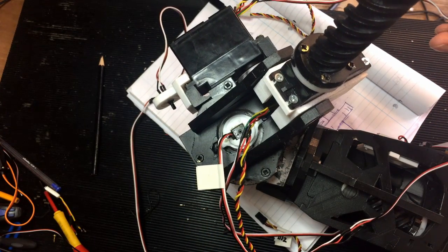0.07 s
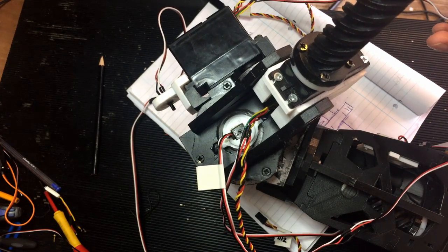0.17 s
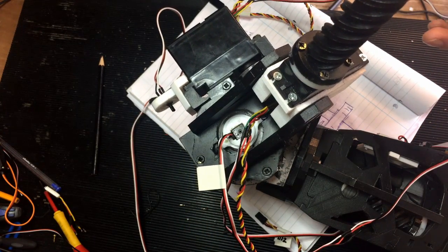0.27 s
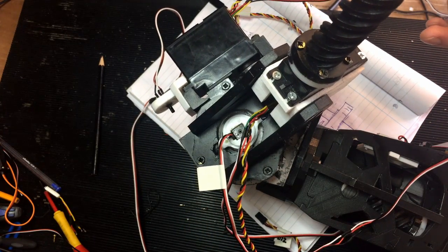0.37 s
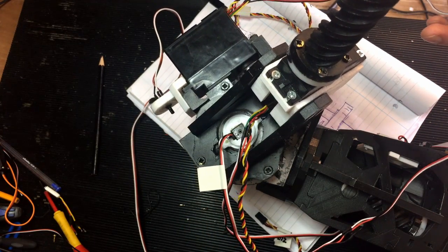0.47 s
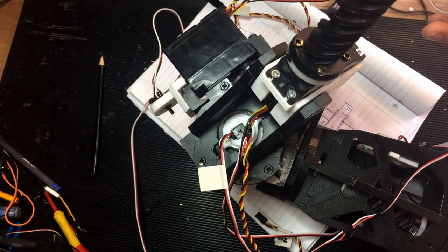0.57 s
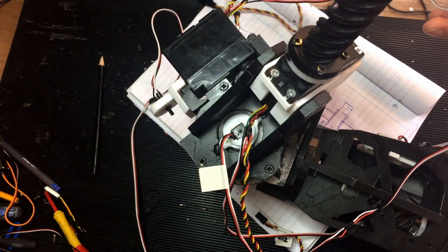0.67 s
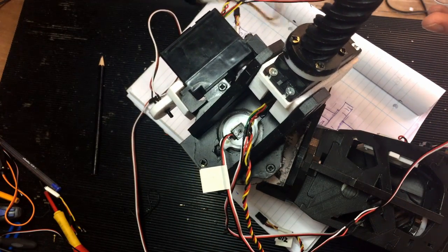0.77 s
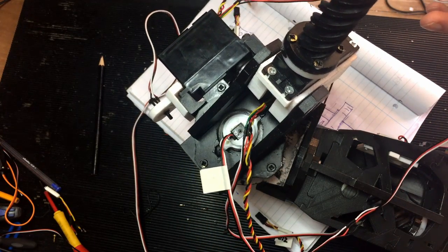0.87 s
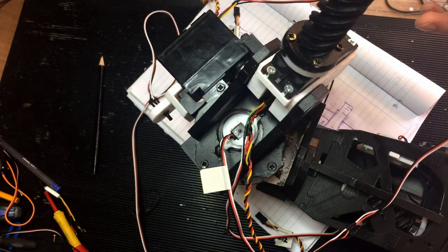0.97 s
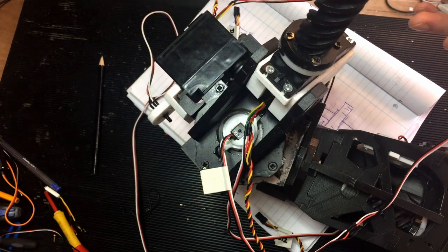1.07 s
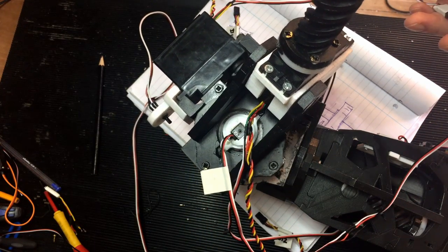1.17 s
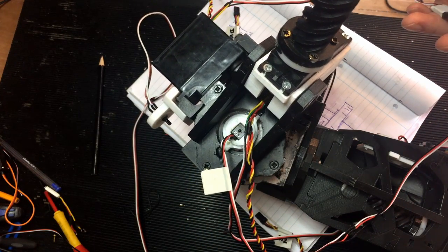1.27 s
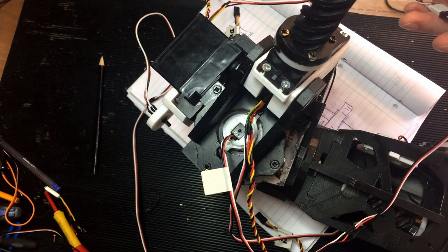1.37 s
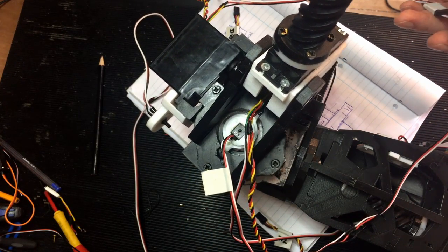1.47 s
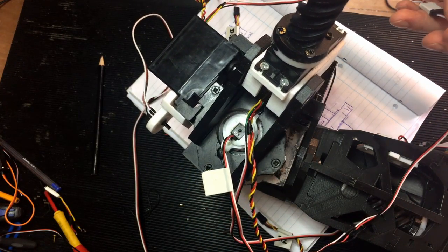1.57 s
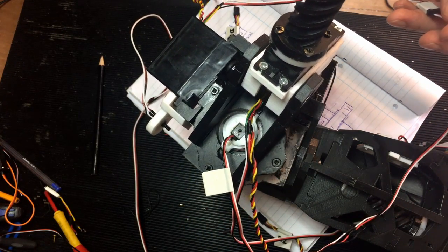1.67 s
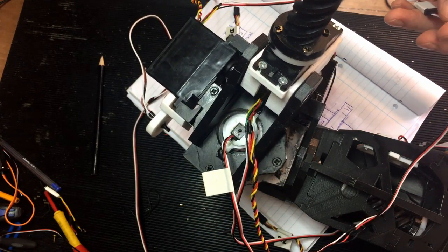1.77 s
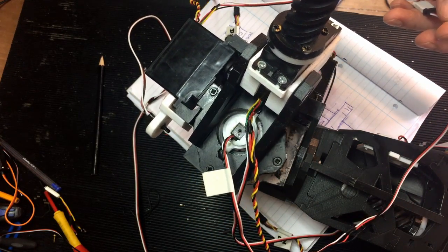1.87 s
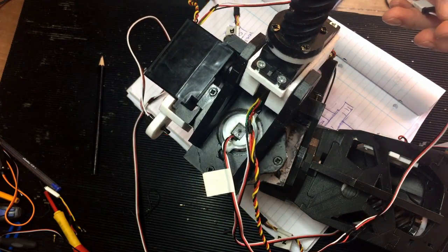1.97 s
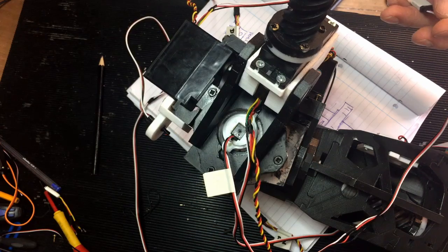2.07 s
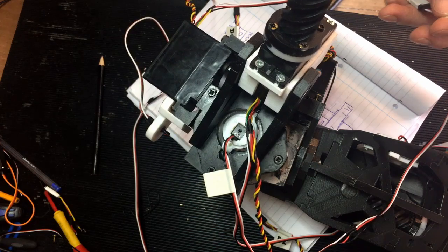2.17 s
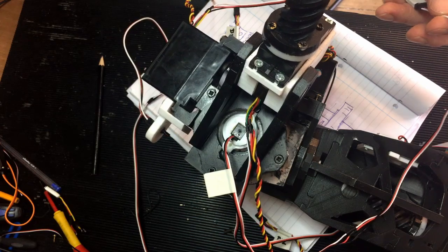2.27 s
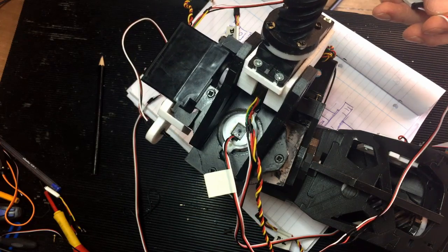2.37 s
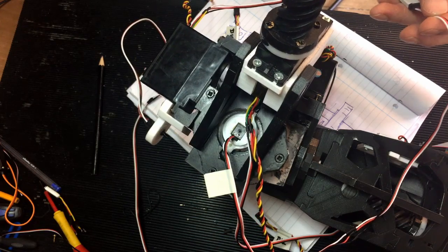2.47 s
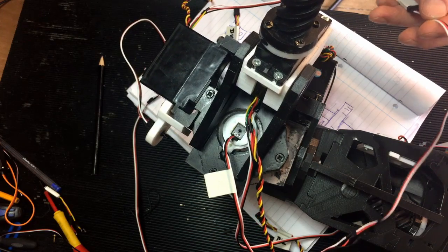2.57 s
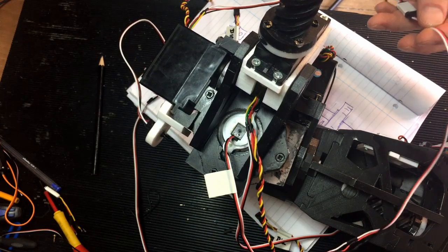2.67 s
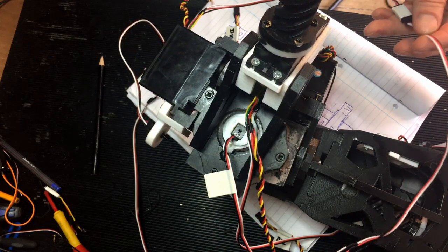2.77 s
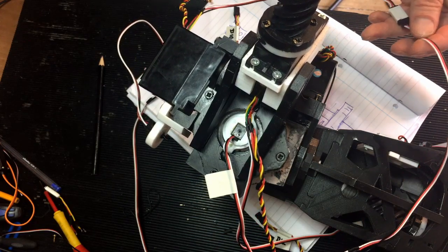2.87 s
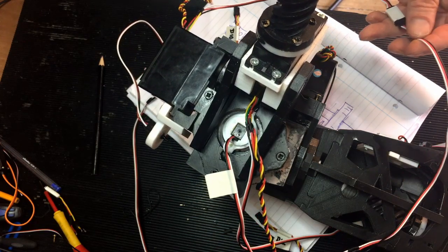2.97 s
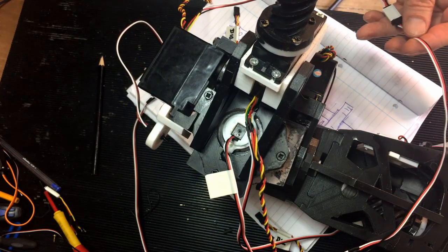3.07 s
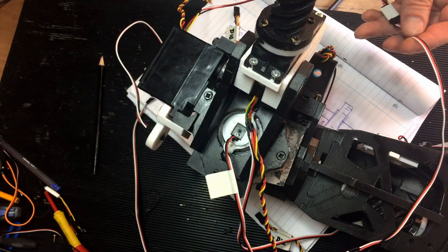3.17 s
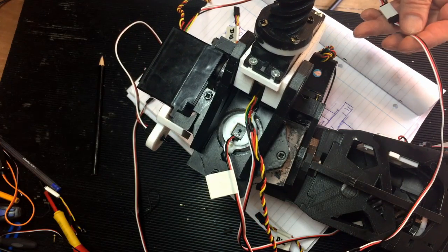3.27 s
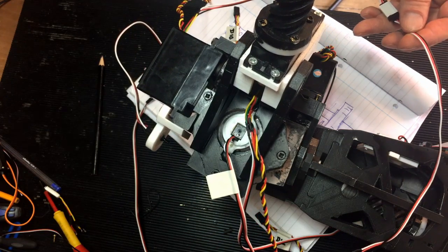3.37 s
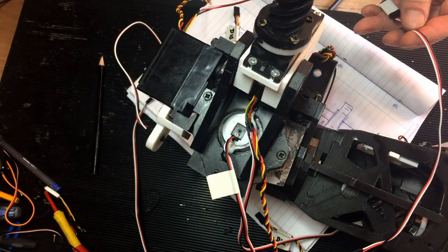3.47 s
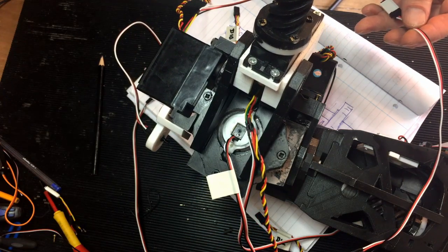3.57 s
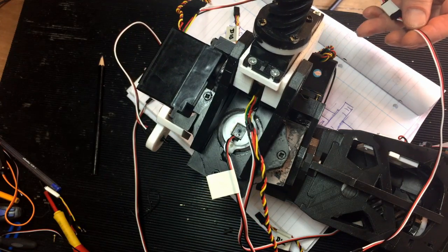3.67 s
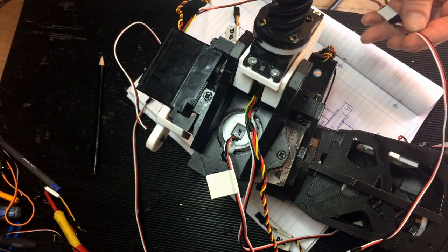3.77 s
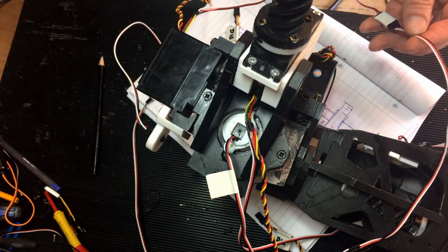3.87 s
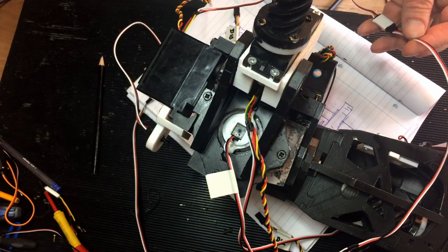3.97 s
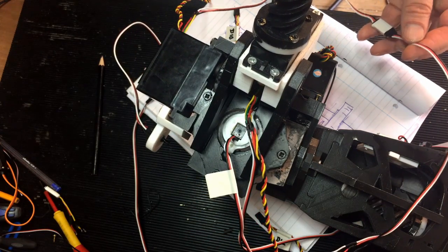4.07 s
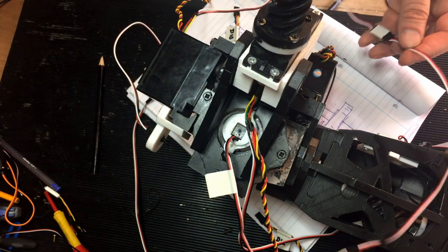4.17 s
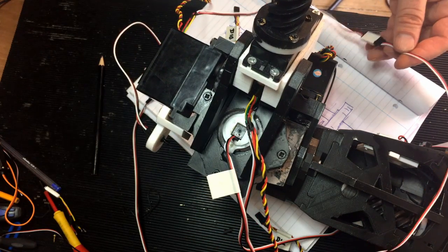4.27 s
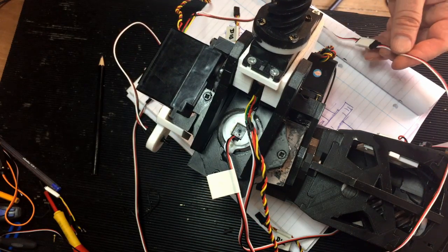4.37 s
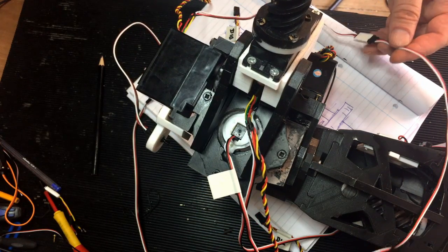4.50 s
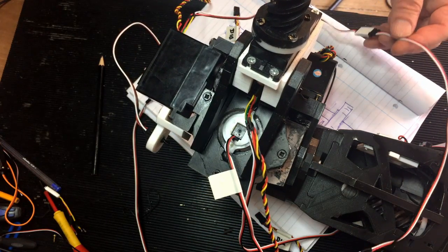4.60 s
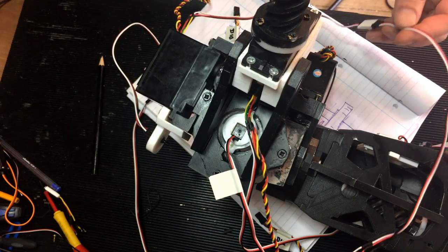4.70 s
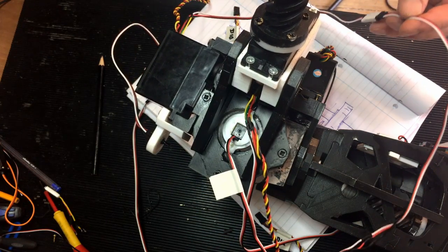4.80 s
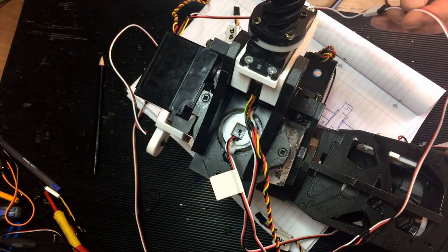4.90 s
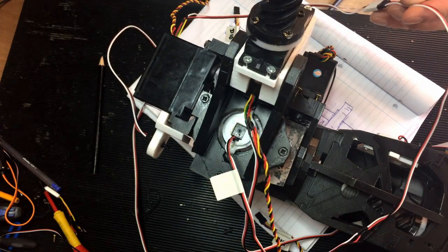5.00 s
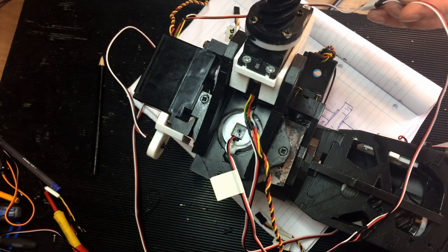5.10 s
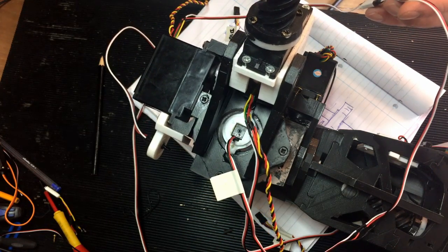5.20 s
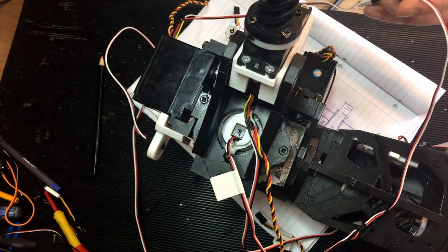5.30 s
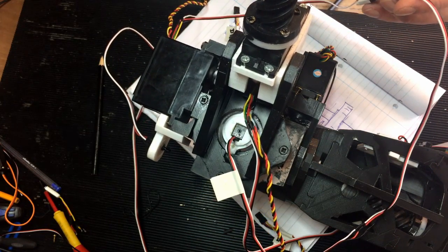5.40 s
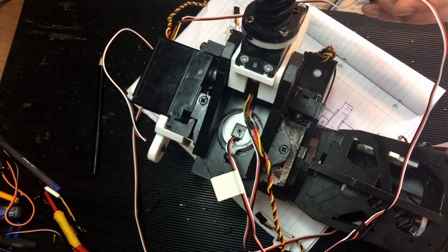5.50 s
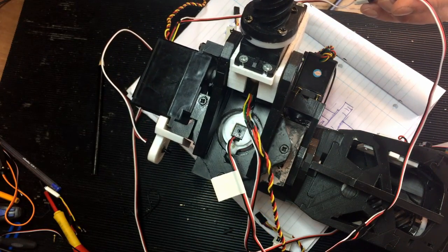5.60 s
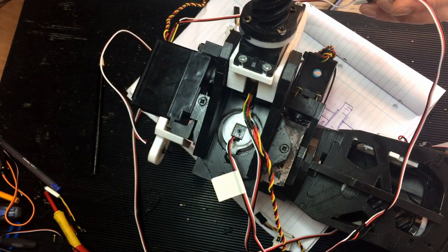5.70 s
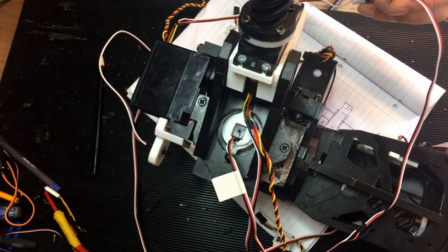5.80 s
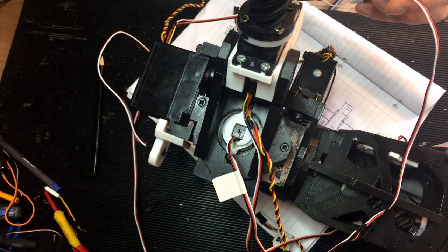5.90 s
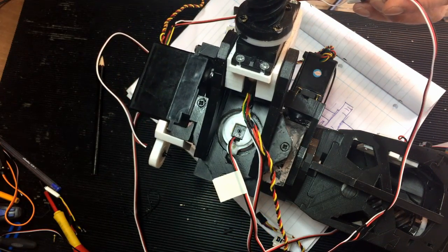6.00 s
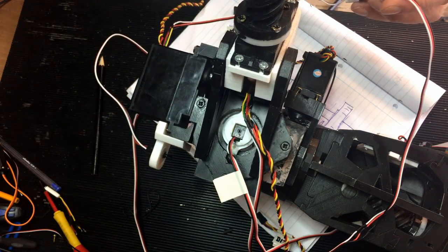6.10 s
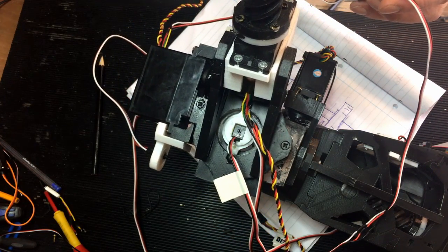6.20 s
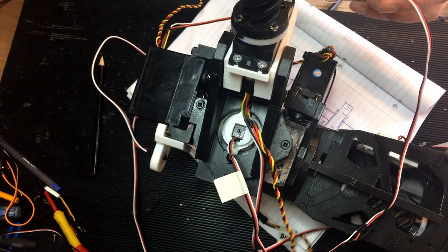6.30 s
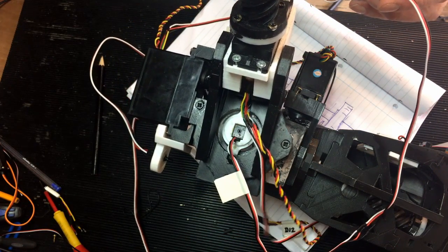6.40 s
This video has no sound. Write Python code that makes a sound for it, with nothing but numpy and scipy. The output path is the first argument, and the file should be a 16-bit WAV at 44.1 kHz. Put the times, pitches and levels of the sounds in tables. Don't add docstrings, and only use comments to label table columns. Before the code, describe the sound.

A small geared servo whines and rattles as a robot arm turns, brakes to a faintly ticking rest, then whirs back more softly over low bench hum.

```python
import sys
import numpy as np
from scipy import signal
from scipy.fft import rfft, irfft, next_fast_len
from scipy.io import wavfile
from scipy.ndimage import uniform_filter1d

SR = 44100
rng = np.random.default_rng(int(sys.argv[2]) if len(sys.argv) > 2 else 0)


def volts(x):
    e = np.asarray(x, float) / 20
    return 10 ** e


def persist_wave(psi):
    counts = np.round(np.clip(psi, -1, 1) * 32767).astype(np.int16)
    wavfile.write(sys.argv[1], SR, np.atleast_2d(counts).T)


N = 284356

# (time [s], mesh rate [Hz], load [dB], lower tones [dB], upper tones [dB])
TURN_OUT = [
    (0.0, 1090, 0, -54.5, -50),
    (0.27, 1014, -0.5, -56, -48.5),
    (0.44, 1071, -0.5, -57, -62),
    (0.61, 1090, 0, -56, -54.5),
    (0.77, 1299, 0.5, -47, -49.5),
    (0.95, 1527, 2, -54, -54.5),
    (1.09, 1458, 1, -58, -56),
    (1.25, 1265, 0, -52, -52),
    (1.48, 1060, 0, -53.5, -51),
]
BRAKING = [
    (1.74, 1090, 1, -48.5, -48),
    (1.83, 1004, 0.0084, -54, -47),
    (1.931, 975, 0, -59, -55),
    (2.28, 870, 0.37, -60, -50.5),
    (2.48, 735, 0, -68, -68),
]
TURN_BACK = [
    (5.13, 748, -0.89, -67, -55),
    (5.359, 768, -0.25, -66, -55),
    (5.5, 938, -1, -55, -49.5),
    (5.79, 748, -1.22, -65, -56),
    (6.0, 875, 0.19, -50, -57),
    (6.189, 937, -0.67, -56.5, -51),
    (6.33, 829, -0.3, -52, -55),
]
STOP_S, START_S = 3.386, 4.57
STALL_HZ, REST_WHINE_DB = 400, -68.5

# (multiple of mesh rate, level [dB], width [Hz], group: 0 lower, 1 upper)
TONES = [(1.269, 3, 90, 0), (2.001, 2, 34, 0), (2.451, -1, 50, 0), (3.0, 0.5, 108, 0), (4.0, -8.5, 100, 0),
         (4.98, -2.5, 112, 1), (5.9, -8.5, 202, 1)]
TONE_FLUTTER_DB, TONE_FLUTTER_S = 2.5, .05
# (centre [Hz], width [Hz], level [dB])
CASE_MODES = [(2652, 160, -6.5), (2803, 18, 4), (3041, 60, 5), (3307, 89, 9.5), (3334, 280, -6.5),
              (3563, 20, 9.5), (3763, 410, -4.5), (3795, 19, 8.5), (4230, 53, 1.5), (4406, 20, 9.5),
              (4427, 390, 3.5), (4885, 125, -3), (5000, 155, 1), (5307, 41, 6.5), (5486, 83, 7.5),
              (5640, 41, -6), (5658, 89, 1.5), (5963, 36, 6), (6096, 160, 0), (6503, 116, 5.5),
              (6380, 360, -10.5), (7500, 610, -1), (7885, 167, 3), (8290, 275, -1.5), (8780, 280, 0),
              (9550, 1560, -8.5), (11410, 380, -8.5), (12040, 410, -10.5), (14560, 500, -15),
              (15400, 290, -25)]
# (frequency [Hz], level per Hz [dB])
CASE_WALL = [(290, -69), (500, -11), (818, -7), (1000, 1), (1140, -8.5), (1550, -5), (1870, -1.5),
             (2490, -8), (3280, -18.5), (4710, -1.5), (5610, -10), (6860, 5), (7820, 0), (10400, -14),
             (15900, -42)]
# (centre [Hz], width [Hz], share added [1])
BACK_FLANKS = [(2771, 650, -0.55), (3370, 150, 1.23), (5646, 380, 0.35), (13000, 3700, 0.23)]
# (delay [s], level [dB])
BOUNCES = [(.0021, -2.5), (.0037, -14), (.0064, -12), (.0098, -7.5)]
# (centre [Hz], width [Hz], share removed [1])
TREBLE_DIPS = [(10500, 440, 0.46), (13100, 330, 0.36), (15000, 360, .7)]
RATTLE_DB, RATTLE_DB_PER_DECADE, RATTLE_REST_DB = -45, 14, -77.5
BRIGHT_DB, BRIGHT_DB_PER_OCTAVE, BRIGHT_TOP_DB = -4.5, 13.5, -3.5
TREBLE_HZ = 6950

# (frequency [Hz], level [dB], t60 [s])
KICK_DULL_MODES = [(820, -13.5, 0.038), (1134, -14.5, 0.085), (1320, -14.5, 0.053), (1805, -12, 0.025),
                   (1800, -4, 0.0051)]
# (frequency [Hz], level [dB], t60 [s])
KICK_BRIGHT_MODES = [(2760, -33, 0.046), (3352, -13.5, 0.051), (3500, -12.5, 0.041), (4400, -18.5, 0.033),
                     (5100, -8.5, 0.0051), (4040, -8, 0.0052)]
FRAME_S, FIRST_KICK_S = .020142, .0150
KICK_DB, KICK_BRIGHT_DB, KICK_SPREAD_DB = -52.5, 1, 3
KICK_FOLLOWS = 0.7
# (time [s], length [s], bright level [dB], dull level [dB])
HUNTS = [(3.099, .06, -47.5, -52), (3.168, .06, -49, -53), (3.23, .08, -48, -51.5), (3.353, .06, -52, -59),
         (3.427, .08, -53, -54), (3.53, .1, -52, -55.5), (3.63, .04, -54, -63), (3.672, .06, -53.5, -55.5),
         (3.732, .04, -55, -57), (3.769, .06, -50.5, -51.5), (3.83, .06, -49.5, -55),
         (3.89, .12, -55.5, -55.5), (4.043, .12, -60, -56.5), (4.18, .1, -56.5, -57), (4.28, .08, -60, -58),
         (4.36, .06, -58.5, -58.5), (4.417, .1, -61, -64), (4.52, .02, -56, -57), (4.551, .11, -61, -57)]
HUNT_FADE_DB_PER_S, HUNT_GAP_DB, HUNT_SPREAD_DB = 38, -74, 2.5

# (middle time [s], peak level [dB], note [Hz], length [s])
SWELLS = [(0.156, -67, 54.7, 0.54), (0.62, -70, 53.8, .16), (0.75, -58, 53.8, 0.1), (0.992, -57.5, 63, 0.2),
          (1.399, -64, 63.5, 0.93), (2.059, -70, 61.33, .16), (2.203, -78, 51.3, 0.26),
          (2.457, -66, 51.5, .18), (2.983, -84, 59, 0.25), (3.38, -69, 49.3, 0.24),
          (3.723, -73, 60.2, 0.29), (3.974, -56, 50.9, 0.15), (4.254, -62.5, 50.5, 0.69),
          (4.749, -67, 50.3, 0.24), (5.149, -62.5, 61.4, .4), (5.717, -55.5, 62.6, 0.73),
          (6.1, -55.5, 62, 0.84), (6.45, -54, 62, .14)]
BENCH_REST_DB = -75
# (time [s], peak level [dB], note [Hz], length [s])
JUDDER = [
    (0.84, -49, 174.2, 0.039),
    (0.865, -47.5, 197.5, 0.046),
    (0.935, -50.5, 172, 0.019),
    (0.966, -43.5, 198.4, 0.042),
    (1.044, -45, 179.7, 0.034),
    (1.121, -62.5, 171.2, 0.029),
    (2.031, -55, 174, 0.026),
]
# (time [s], peak level [dB], centre
# [Hz], width [octaves], t60 [s])
CLICKS = [(.855, -40.5, 720, 2.65, 0.19), (1.265, -53.5, 820, 0.13, 0.15), (1.352, -49.5, 534, 0.39, 0.094),
          (3.177, -53, 1143, 0.11, 0.066), (3.558, -55, 1150, 0.12, 0.058), (3.698, -58, 1116, 0.12, 0.097),
          (3.2584, -40, 10500, 1.8, 0.035), (4.0233, -37, 1950, 1.02, 0.054),
          (4.2677, -40, 9070, 0.2, 0.012), (4.268, -46, 5000, 2.9, 0.057), (4.567, -51, 1260, 0.3, 0.031),
          (4.817, -39, 5300, 0.47, 0.024), (2.11, -48, 1800, .4, 0.041), (2.553, -47, 1520, 0.58, 0.052),
          (2.694, -50, 1760, 0.47, 0.044), (5.976, -50, 1500, 0.61, .04), (5.108, -52.5, 1785, 0.32, 0.039),
          (5.253, -52, 2425, 0.16, 0.1), (5.373, -48.5, 1780, .4, 0.046)]
# (centre [Hz], width [Hz], level [dB])
WHISTLE = [(8300, 140, -93), (8200, 650, -74.5)]
# (frequency [Hz], level [dB])
ROOM = [(15, -42), (25, -0.5), (70, -0.5), (180, -6.5), (334, -9.5), (543, -15), (1130, -11), (1440, -17.5),
        (2670, -20), (3410, -20), (5540, -24), (7260, -39), (8310, -39), (10600, -31), (15900, -29.5)]
ROOM_DB = -64.5
TOP_HZ = 15740


def motion():
    rest = [(s, STALL_HZ, 0, REST_WHINE_DB, REST_WHINE_DB) for s in (STOP_S, START_S)]
    mesh_hz, load_db, *tone_db = in_time(TURN_OUT + BRAKING + rest + TURN_BACK)
    above_stall = np.maximum((mesh_hz - STALL_HZ) / (1000 - STALL_HZ), 1e-9)
    rattle_db = RATTLE_DB + load_db + RATTLE_DB_PER_DECADE * np.log10(above_stall)
    rattle_db = np.maximum(rattle_db, RATTLE_REST_DB)
    bright_db = np.minimum(BRIGHT_DB + BRIGHT_DB_PER_OCTAVE * np.log2(mesh_hz / 1000), BRIGHT_TOP_DB)
    return mesh_hz, rattle_db, bright_db, *tone_db


def gears(mesh_hz, rattle_db, bright_db, *tone_db):
    sound = case(tooth_knocks(mesh_hz), pinion_tones(mesh_hz, tone_db))
    low = signal.sosfilt(signal.butter(4, TREBLE_HZ, fs=SR, output="sos"), sound)
    high = signal.sosfilt(signal.butter(4, TREBLE_HZ, "high", fs=SR, output="sos"), sound)
    low_level = np.sqrt(uniform_filter1d(low ** 2, size=SR // 5) + 1e-12)
    return volts(rattle_db) * (low / low_level + volts(bright_db) * rms_one(bounce(high)))


def tooth_knocks(mesh_hz):
    struck = rng.random(N) < 8.0 * mesh_hz / SR
    knocks = struck * volts(2.11 * rng.exponential(1, N)) * rng.choice([-1, 1], N)
    since_kick_s = (np.arange(N) / SR - FIRST_KICK_S) % FRAME_S
    force_db = 2.5 * np.exp(-since_kick_s / .006) + 1.5 * drift(60)
    knocks = rms_one(knocks / np.sqrt(mesh_hz)) * volts(force_db)
    flanks = sum(share * resonate(knocks, hz, width) for hz, width, share in BACK_FLANKS)
    turning_back = np.arange(N) > START_S * SR
    return knocks + turning_back * flanks


def pinion_tones(mesh_hz, tone_db):
    phase = 2 * np.pi * np.cumsum(mesh_hz * (1 + 0.0061 * drift(25.8))) / SR
    tones = np.zeros(N)
    for k, db, width, upper in TONES:
        wave = drift(width) * np.sin(k * phase) + drift(width) * np.cos(k * phase)
        tones += volts(db + tone_db[upper] + flutter()) * wave
    return tones


def flutter():
    knots = np.arange(0, N + SR, TONE_FLUTTER_S * SR)
    return TONE_FLUTTER_DB * np.interp(np.arange(N), knots, rng.standard_normal(len(knots)))


def case(knocks, tones):
    drive = knocks + volts(41.0) * tones
    knots = np.arange(0, N + SR, SR // 6)
    swell_db = 2.2 * rng.standard_normal((len(CASE_MODES), len(knots)))
    out = volts(-11) * colour(drive, CASE_WALL)
    for k, (hz, width, db) in enumerate(CASE_MODES):
        swell = (hz < 7000) * np.interp(np.arange(N), knots, swell_db[k])
        out += resonate(drive, hz, max(width, SR / 800)) * volts(db + swell) * (-1) ** k
    leak = signal.butter(2, [2700, 6500], "band", fs=SR, output="sos")
    return out + volts(34) * signal.sosfilt(leak, tones)


def bounce(x):
    out = x.copy()
    for k, (delay, db) in enumerate(BOUNCES):
        lag = round(delay * SR)
        out[lag:] += volts(db) * x[:-lag] * (-1) ** k
    for hz, width, share in TREBLE_DIPS:
        out = out - share * resonate(out, hz, width)
    return out


def blows(rattle_db):
    s = np.arange(FIRST_KICK_S, N / SR - .01, FRAME_S)
    at = (s * SR).astype(int)
    dull_chance, bright_chance = rng.standard_normal((2, len(s)))
    dull = KICK_DB + KICK_FOLLOWS * (rattle_db[at] - RATTLE_DB) + KICK_SPREAD_DB * dull_chance
    bright = dull + KICK_BRIGHT_DB
    resting = (s > HUNTS[0][0]) & (s < sum(HUNTS[-1][:2]))
    dull[resting] = bright[resting] = HUNT_GAP_DB
    for start, length, bright_db, dull_db in HUNTS:
        inside = (s > start) & (s < start + length)
        burst_dull = dull_db - HUNT_FADE_DB_PER_S * (s - start) + HUNT_SPREAD_DB * dull_chance
        dull[inside] = burst_dull[inside]
        bright[inside] = (bright_db + HUNT_SPREAD_DB * bright_chance)[inside]
    return at, dull, bright


def kicks(at, dull, bright):
    out = np.zeros(N)
    for modes, blow_db in ((KICK_DULL_MODES, dull), (KICK_BRIGHT_MODES, bright)):
        for hz, db, t60 in modes:
            impulses = np.zeros(N)
            late = rng.integers(10, 40, len(at))
            impulses[at + late] = volts(blow_db + db + 2.5 * rng.standard_normal(len(at)))
            width_hz = np.log(1000) / np.pi / t60
            out += resonate(impulses, hz, width_hz) * SR / (np.pi * width_hz)
    push = np.zeros(N)
    push[at] = volts(dull)
    thud = resonate(resonate(push, 133, 270), 105, 193)
    return out + volts(24.0) * thud


def swells():
    t = np.arange(N) / SR
    middle, _, hz, _ = np.transpose(SWELLS)
    gain = volts(BENCH_REST_DB)
    for s, db, _, length in SWELLS:
        gain = gain + volts(db) * np.cos(np.pi * np.clip((t - s) / length, -.5, .5)) ** 2
    return np.interp(t, middle, hz), 20 * np.log10(gain)


def bench(hum_hz, hum_db):
    phase = 2 * np.pi * np.cumsum(hum_hz) / SR
    out = volts(hum_db) * rms_one((2.6 + drift(10)) * np.sin(phase) + drift(27) * np.cos(phase))
    for s, db, hz, length in JUDDER:
        t = np.arange(round(length * SR)) / SR
        out[round(s * SR):][:len(t)] += volts(db) * np.sin(np.pi * t / length) * np.sin(2 * np.pi * hz * t)
    return out


def clicks():
    out = np.zeros(N)
    t = np.arange(SR // 8) / SR
    for s, db, hz, octaves, t60 in CLICKS:
        edges_hz = np.clip(hz * 2 ** (np.array([-.5, .5]) * octaves), 20, .45 * SR)
        band = signal.butter(2, edges_hz, "band", fs=SR, output="sos")
        envelope = volts(-60 * t / t60) * np.minimum(t / t60 / 0.065, 1)
        burst = signal.sosfilt(band, rng.standard_normal(len(t)) * envelope)
        out[round(s * SR):][:len(t)] += volts(db) * burst / np.abs(burst).max()
    return out


def room():
    out = volts(ROOM_DB) * rms_one(colour(rng.standard_normal(N), ROOM))
    for hz, width, db in WHISTLE:
        hiss = rms_one(resonate(rng.standard_normal(N), hz, width))
        out += volts(db + 1.85 * drift(42)) * hiss
    return out


def rms_one(x):
    return x / np.sqrt(np.mean(x ** 2) + 1e-20)


def in_time(rows):
    s, *columns = np.transpose(rows)
    return [np.interp(np.arange(N) / SR, s, c) for c in columns]


def drift(rate):
    r = np.exp(-2 * np.pi * rate / SR)
    return rms_one(signal.lfilter([1], [1, -2 * r, r * r], rng.standard_normal(N + SR))[SR:])


def colour(x, spectrum):
    size = next_fast_len(N)
    hz, db = np.transpose(spectrum)
    log_hz = np.log(np.maximum(np.arange(size // 2 + 1) * SR / size, 1))
    gain = volts(np.interp(log_hz, np.log(hz), db))
    return irfft(rfft(x, size) * gain, size)[:N]


def resonate(x, hz, width_hz):
    r = np.exp(-np.pi * width_hz / SR)
    poles = [1, -2 * r * np.cos(2 * np.pi * hz / SR), r * r]
    return signal.lfilter([(1 - r * r) / 2, 0, (r * r - 1) / 2], poles, x + 1e-18)


def scene():
    mesh_hz, rattle_db, *shares_db = motion()
    servo = gears(mesh_hz, rattle_db, *shares_db) + kicks(*blows(rattle_db))
    mix = servo + bench(*swells()) + clicks() + room()
    return mix[None]


def roll_off(x):
    return signal.sosfilt(signal.butter(12, 16040, fs=SR, output="sos"), x)


def record(dry):
    mix = signal.sosfilt(signal.butter(4, 36, "high", fs=SR, output="sos"), dry)
    mix = signal.sosfilt(signal.ellip(12, .5, 60, TOP_HZ, fs=SR, output="sos"), mix)
    return roll_off(mix)


dry = scene()
out = record(dry)
persist_wave(out)
```